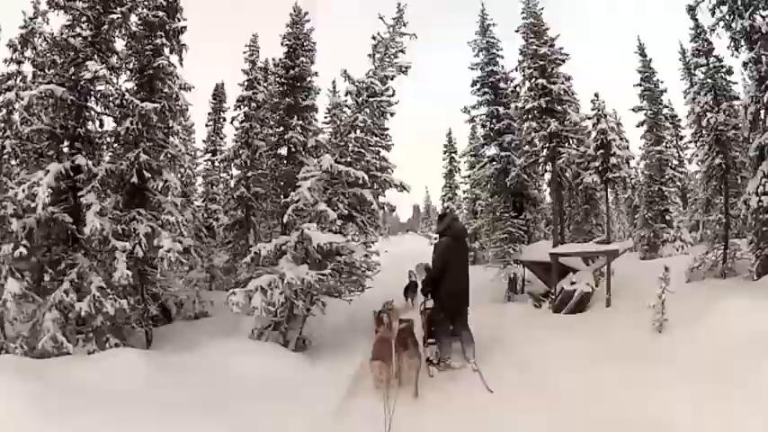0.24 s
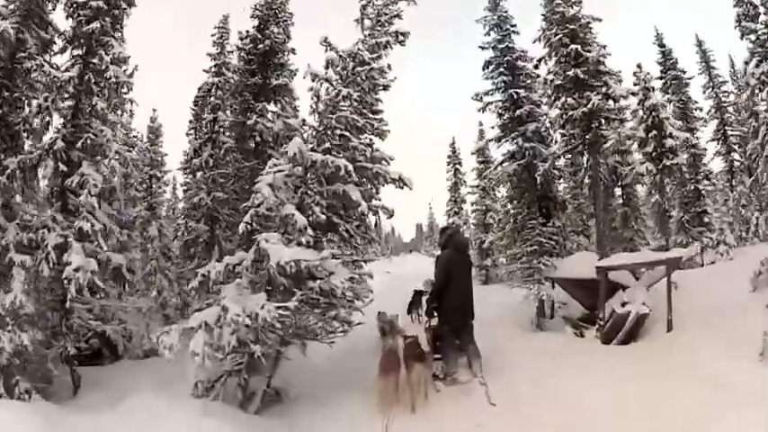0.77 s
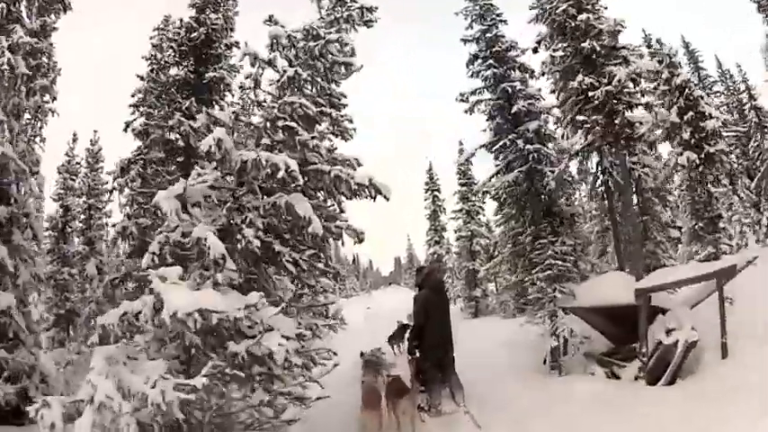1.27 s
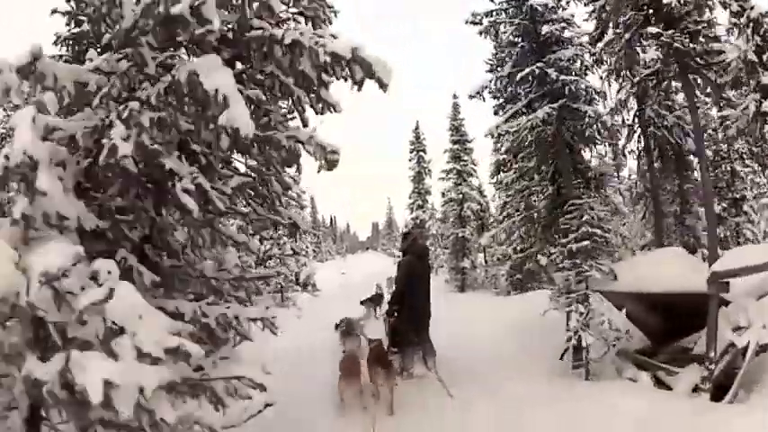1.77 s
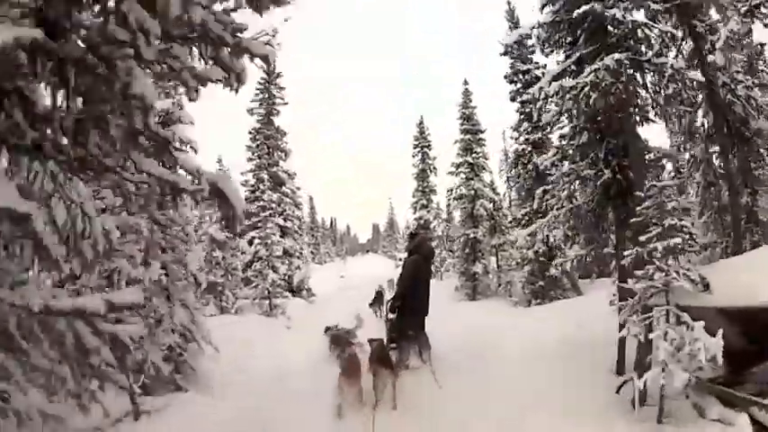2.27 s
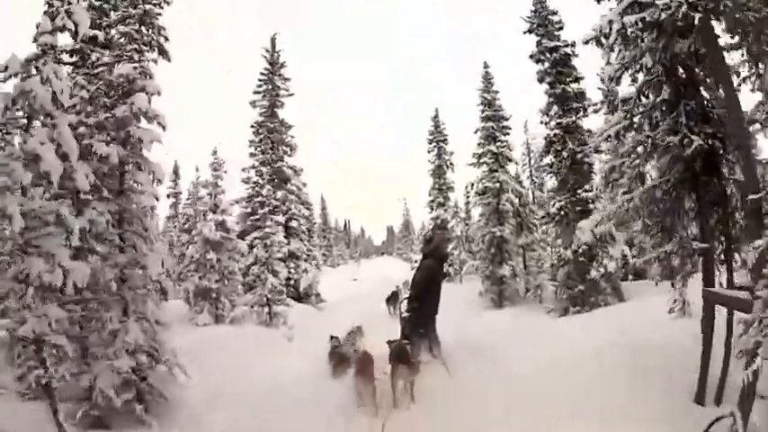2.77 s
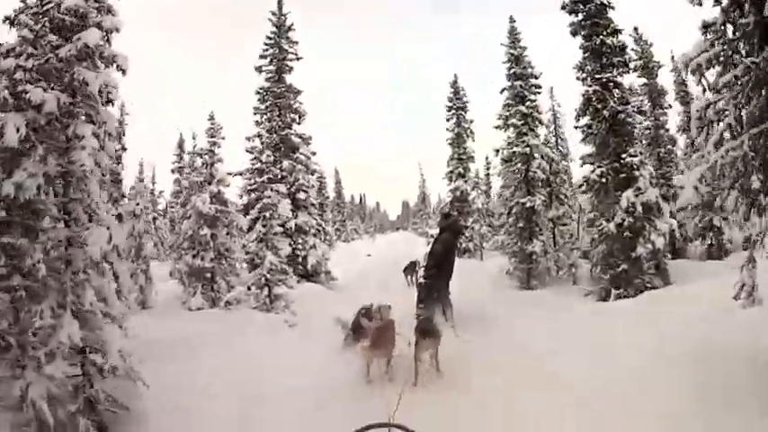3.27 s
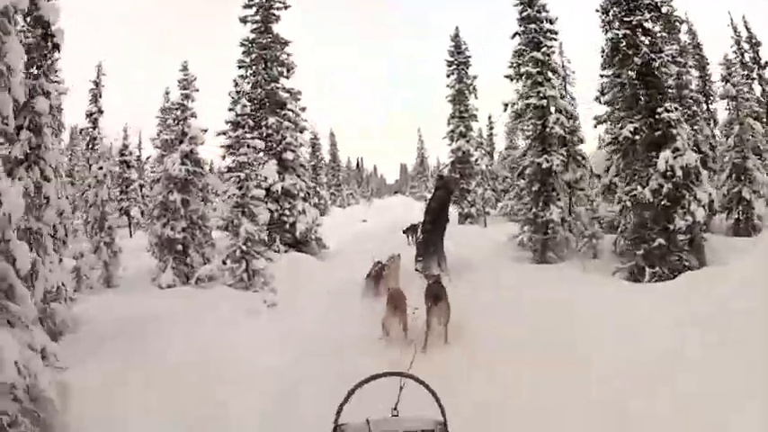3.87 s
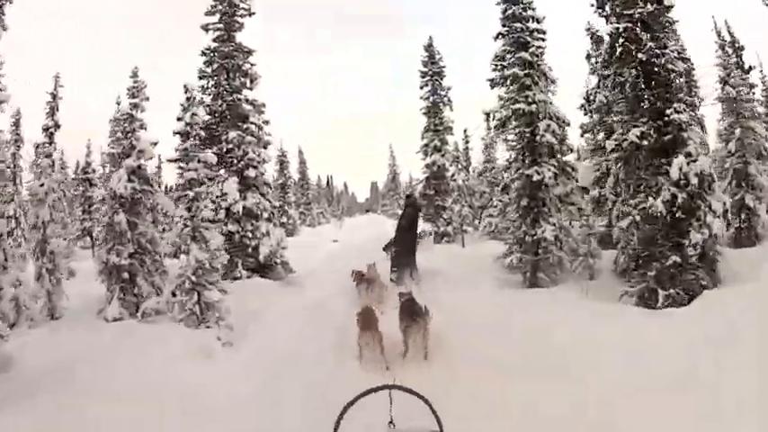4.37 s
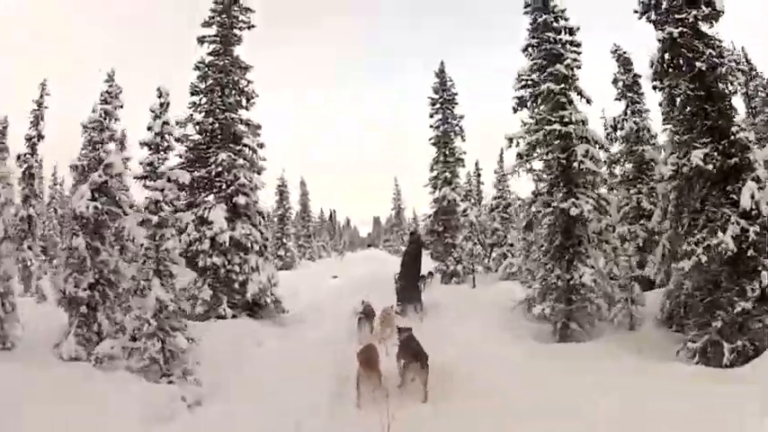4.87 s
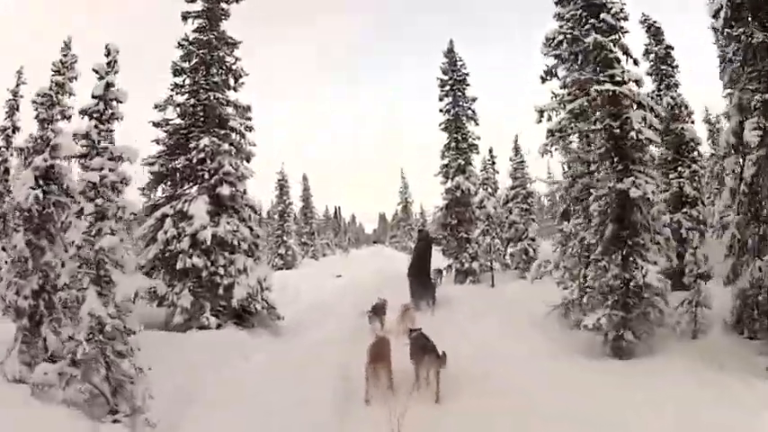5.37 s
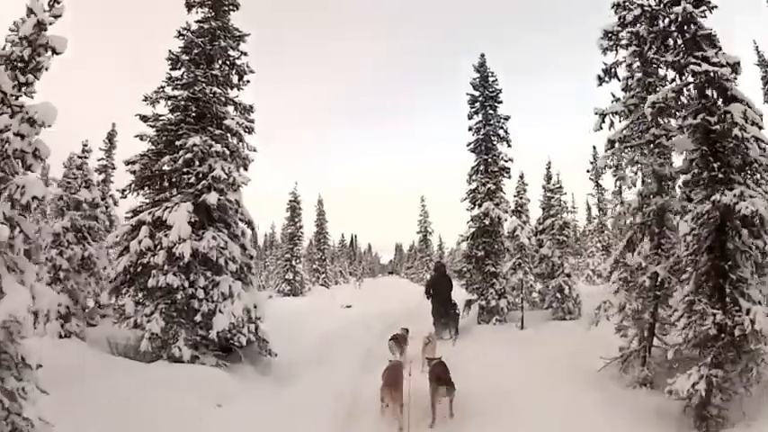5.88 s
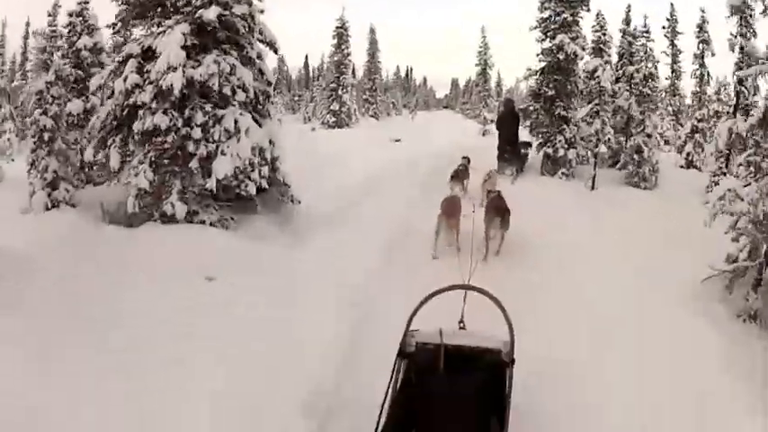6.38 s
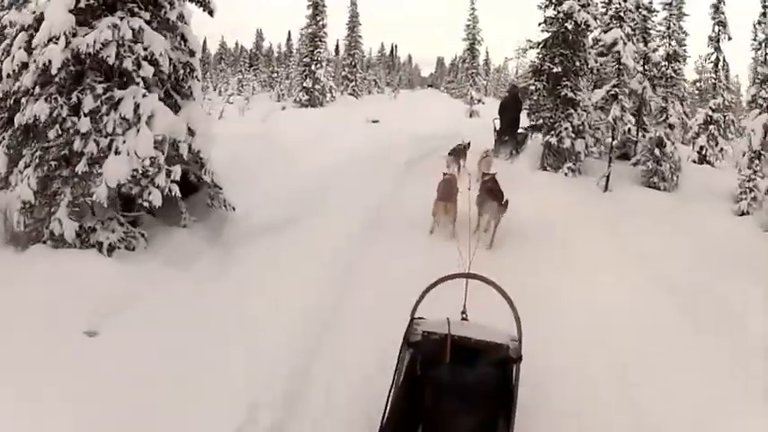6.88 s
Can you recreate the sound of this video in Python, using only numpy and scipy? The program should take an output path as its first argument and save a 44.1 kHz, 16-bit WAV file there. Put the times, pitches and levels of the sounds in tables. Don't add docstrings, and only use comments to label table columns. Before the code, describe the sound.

Close, dull and boxy sound from a camera riding on a sled in open snowy woods. Runners hit snow lumps, making the wooden frame thud and hum at low pitch without any steady rhythm. Wind bumps softly on the case, a loose catch clicks, and thin icy hiss leaks through. Powder brushes past briefly at two seconds; a sharp twig flick comes late, among final heavy knocks.

```python
import sys
import numpy as np
from scipy import signal
from scipy.fft import rfft, irfft, next_fast_len
from scipy.io import wavfile
from scipy.ndimage import uniform_filter1d

SR = 44100
rng = np.random.default_rng(int(sys.argv[2]) if len(sys.argv) > 2 else 0)


def decibels_to_gain(level_db):
    exponent = np.asarray(level_db, float) / 20
    return 10 ** exponent


def persist_wave(psi):
    counts = np.round(np.clip(psi, -1, 1) * 32767).astype(np.int16)
    wavfile.write(sys.argv[1], SR, np.atleast_2d(counts).T)


N = 314874

# (time [s], shaking change [dB], half length [s])
TRAIL_HUMPS = [(3.28, -4, 0.013), (.1, 10, 0.053), (.22, 10.5, 0.038), (.46, 6, 0.013), (.52, -14, 0.0062),
               (.72, 1, 0.067), (1.05, 1.5, 0.08), (1.39, 8, 0.082), (1.67, 6, 0.11), (1.91, 7.5, 0.064),
               (2.17, 1.5, 0.042), (2.33, 6.5, 0.073), (2.62, 6, 0.018), (2.72, 10, 0.08), (3.04, 4, 0.094),
               (3.21, 6, 0.038), (3.64, 4.5, 0.024), (3.72, -2.5, 0.018), (3.82, 10, 0.013),
               (4.21, 7, 0.11), (4.26, -12, 0.02), (4.57, 10, 0.085), (4.79, 11.5, 0.063), (4.92, 8, 0.04),
               (5.53, 4.5, 0.048), (6.03, 2, 0.052), (6.31, 7, 0.071), (6.45, -8.5, 0.095),
               (6.56, 2, 0.088), (6.7, 8, 0.22), (.405, -8, .008), (.64, -11, 0.0088), (1.48, -5.5, 0.023),
               (1.775, -5, .015), (3.555, -5, .008), (3.742, -9, 0.0079), (4.075, -9, 0.0075),
               (4.185, -12, 0.0054), (4.228, -13, .005), (6.52, 1, .02), (6.39, -3.5, .04)]
# (time [s], change [dB], half length [s])
SLAT_CHATTER = [(.01, 5, 0.016), (.64, 1, .03), (1.162, -0.5, 0.033), (1.282, 3.5, 0.033),
                (1.44, 2.5, 0.026), (1.64, -2.5, 0.068), (1.8, -6, .02), (2.44, 2.5, 0.037),
                (3.1, 0, 0.057), (3.72, 0.5, 0.026), (4.5, -0.5, .05), (4.84, -6, 0.025), (4.994, 5, 0.015),
                (5.16, 4.5, 0.039), (5.3, 1, 0.024), (5.498, 8, 0.019), (5.905, 4, 0.016), (6.32, 0, 0.021),
                (6.6, 0, .04), (6.83, 5.5, 0.033)]


def evened(x):
    return x / np.sqrt(np.mean(x ** 2) + 1e-20)


def curve(table, index):
    rows = np.array(table)
    return np.interp(np.arange(N) / SR, rows[:, 0], rows[:, index])


def bells(events):
    t = np.arange(0, N + 64, 64) / SR
    total_db = sum(db * np.exp(-((t - s) / half_s) ** 2) for s, db, half_s in events)
    return np.interp(np.arange(N) / SR, t, total_db)


def add(mix, s, sound):
    part = mix[round(s * SR):][:len(sound)]
    part += sound[:len(part)]


def resonate(x, hz, width_hz):
    turn = np.exp(2j * np.pi * np.cumsum(hz * np.ones(len(x))) / SR)
    r = np.exp(-np.pi * width_hz / SR)
    once = signal.lfilter([1 - r], [1, -r], x / turn)
    twice = signal.lfilter([1 - r], [1, -r], once)
    return 2 * (turn * twice).real


def wobble(hz):
    smooth = uniform_filter1d(rng.standard_normal(N), 200)
    return evened(signal.lfilter([1], [1, -np.exp(-2 * np.pi * hz / SR)], smooth))


def noise(points, patchy_db, flicker_db, size):
    frames, hz = 4 * N // size + 8, np.fft.rfftfreq(size, 1 / SR)
    a, b, patches = rng.standard_normal((frames, len(hz), 3)).T
    patches = uniform_filter1d(patches, size=5, axis=0)
    patches = evened(uniform_filter1d(patches, size=8, axis=1))
    flicker = evened(uniform_filter1d(rng.standard_normal(frames), size=3))
    f, db = np.transpose(points)
    shape_db = np.interp(np.log(hz + 1), np.log(f + 1), db)[:, None]
    spectra = (a + 1j * b) * decibels_to_gain(shape_db + patchy_db * patches + flicker_db * flicker)
    return evened(signal.istft(spectra, nperseg=size, noverlap=3 * size // 4)[1][:N])


def frame():
    # (frequency [Hz], width [Hz], level [dB])
    frame_modes = [(159.5, 60, -12.5), (203.1, 13.7, 3), (242, 28.2, -2), (269.2, 21.2, 1),
                   (287.9, 19.7, 1.5), (335.8, 35, -3.5)]
    # (frequency [Hz], width [Hz], level [dB])
    slat_modes = [(450, 69, 0), (523, 22.2, 1.5), (554.8, 46, -4.5), (663.5, 77, -10), (753, 130, -19),
                  (1031, 125, -31)]
    # (time [s], roughness [dB], slat chatter [dB])
    trail = [(0, -35, 5), (.3, -24, 0.5), (.82, -22.5, 0), (.9, -32.5, 1), (1.2, -27.5, -0.5),
             (1.5, -28, -0.5), (2.0, -29, 2.5), (2.5, -25.5, -1.5), (2.85, -29.5, -3.5), (3.14, -26.5, 0.5),
             (3.5, -20.5, 0), (3.88, -24.5, 1.5), (4.06, -32.5, -1), (4.45, -34.5, -1.5), (5.3, -32, -1),
             (5.75, -25, 1.5), (6.2, -35.5, 1), (7.14, -24.5, 0.5)]
    # (time [s], change [dB], half length [s])
    flex = [(.08, 0.5, 0.033), (1.2, -3, .03), (1.5, 6, 0.041), (1.7, -4.5, .04), (2.32, 6, 0.046),
            (2.8, -5, 0.054), (2.96, 8.5, 0.029), (3.08, 4.5, .03), (3.3, 7.5, 0.095), (3.48, 2.5, 0.032),
            (3.59, -6, 0.017), (4.04, 5, 0.022), (4.2, -9, 0.035), (4.4, -3, 0.054), (4.62, -12, 0.063),
            (4.83, -9, 0.065), (5.23, 5, .06), (5.41, 5.5, 0.03), (5.8, -8, .03), (6.28, -11, 0.028),
            (6.4, 10, 0.032), (6.54, -15, 0.098), (6.68, 5, 0.019), (7.04, 13, 0.027)]
    lumps_per_s, slats_db, slats_on_rough, slats_on_hump = 260, -37, 0.45, 0.56

    sizes = decibels_to_gain(5.5 * np.minimum(rng.exponential(1, N), 4)) * rng.choice([-1., 1.], N)
    lumps = evened(sizes * (rng.random(N) < lumps_per_s / SR))
    drive = (0.44 * lumps + 0.9 * rng.standard_normal(N)) * decibels_to_gain(0.65 * wobble(hz=14))

    def ring(modes):
        return [(-1) ** k * decibels_to_gain(db) * resonate(drive, hz, 1.57 * width_hz)
                for k, (hz, width_hz, db) in enumerate(modes)]

    low = ring(frame_modes)
    low = evened(decibels_to_gain(bells(flex)) * sum(low[:2]) + sum(low[2:]))
    slats = evened(sum(ring(slat_modes)))
    rough_db, hump_db = curve(trail, index=1), bells(TRAIL_HUMPS)
    slats_db = slats_db + bells(SLAT_CHATTER) + curve(trail, index=2)
    slats_db = slats_db + slats_on_rough * (rough_db - rough_db.mean()) + slats_on_hump * hump_db
    return decibels_to_gain(rough_db + hump_db - 0.5) * low + decibels_to_gain(slats_db) * slats


def jolts():
    # (time [s], peak [dB], frequency [Hz])
    ridges = [(0.375, -0.5, 197), (4.66, -10.5, 324), (0.203, -4, 294), (0.291, -6, 275), (0.539, 4, 214),
              (0.569, -3, 206), (0.612, 3.5, 291.5), (0.666, 3.5, 190), (1.142, -5.5, 242),
              (1.569, -9, 204), (1.795, -2, 269), (1.894, 3, 267), (2.035, -3, 271), (2.169, 2, 242),
              (2.884, -3.5, 230), (3.754, -14, 241), (3.906, -4, 257), (4.124, -7.5, 277),
              (4.277, -9, 261.3), (4.498, -7, 353), (4.882, -18, 270), (4.99, -4.5, 270), (5.093, -7, 279),
              (5.351, -5, 251), (5.466, -6.5, 244), (5.487, -4.5, 325), (5.62, -6.5, 247), (6.026, -4, 245),
              (6.552, 0.5, 279), (7.088, -2, 205), (0.175, -14, 280), (0.243, -8, 267), (0.704, -4, 242),
              (0.976, -5, 243), (1.037, -6, 280), (3.22, -8, 215), (1.318, -3, 258), (1.53, -14, 264),
              (1.625, 0, 246), (1.68, 2.5, 272), (2.11, -14, 318), (2.286, -17, 225), (2.311, -2.5, 215),
              (2.368, 0, 268), (2.61, -13, 202), (2.71, -2, 267), (3.012, -10, 218), (3.308, -8, 248),
              (3.425, -3.5, 272), (3.625, -1.5, 284), (3.779, -2, 209), (4.44, -21, 276), (4.95, -9.5, 278),
              (5.545, -9, 300), (5.999, -7.5, 284), (6.59, -7, 263), (6.796, -15, 262)]
    # (time [s], peak [dB], frequency [Hz])
    slaps = [(0.09, -9, 368), (1.032, -18.5, 617), (2.5, -24, 570), (3.64, -13, 534), (5.11, -21.5, 618),
             (5.468, -15.5, 520), (5.82, -12.5, 450), (5.95, -21, 567), (6.74, -16, 450),
             (6.85, -11.5, 502), (0.32, -14.5, 437), (0.378, -20, 470), (0.596, -18, 502),
             (0.707, -15, 493), (0.822, -12, 517), (1.832, -18, 530), (2.373, -25, 554), (3.018, -17, 480),
             (0.67, -15.5, 514), (4.876, -16, 450), (5.442, -17, 518), (5.651, -14, 523), (6.065, -13, 480),
             (6.802, -10, 520), (0.438, -18, 458), (0.635, -19, 420), (0.743, -24, 497),
             (1.241, -23.5, 506), (1.391, -13.5, 443), (1.901, -19, 528), (1.92, -14.5, 537),
             (2.415, -26, 450), (2.651, -15.5, 437), (3.053, -18, 565), (3.374, -23, 460),
             (3.521, -15, 533), (3.784, -12, 467), (4.146, -20, 496), (5.157, -20.5, 447),
             (5.549, -18, 550), (5.596, -16.5, 536), (5.907, -9.5, 430), (6.274, -19, 500),
             (6.318, -17, 486), (6.599, -20, 450), (1.182, -23, 536), (1.266, -22, 520), (2.326, -25, 580)]
    # (time [s], peak [dB], frequency [Hz])
    load_drops = [(0.86, -16.5, 70), (2.16, -14, 127), (3.28, -29, 110), (3.73, -16, 119),
                  (3.98, -15.5, 121), (1.23, -12, 45), (0.013, -5, 102), (0.21, -1.5, 147),
                  (2.252, -8, 159), (3.86, -3.5, 131), (6.905, -9, 126), (7.019, -1, 72)]
    # (time [s], peak [dB], frequency [Hz])
    washboards = [(0.07, -8, 330), (0.09, -6, 280), (2.13, -4, 184), (0.839, -12, 480), (3.8, -14, 300),
                  (3.648, 1.5, 189), (3.797, -2, 195), (6.299, -1.5, 273.3), (6.69, -0.5, 313),
                  (6.82, 2, 217), (6.8, -14, 518), (7.7, -7, 440), (3.66, -11, 520)]

    out, t = np.zeros(N), np.arange(9000) / SR
    for events, rise_s, trim_db, t60_s in ((ridges, 0.007, -3.5, 0.06),
                                           (slaps, 0.0025, -4, 0.064),
                                           (load_drops + washboards, 0.012, -4, 0.092)):
        rise = 1 - np.exp(-(t / rise_s) ** 2)
        for s, db, hz in events:
            decay = decibels_to_gain(db + trim_db - 60 * t / t60_s)
            add(out, s, decay * rise * np.sin(2 * np.pi * hz * t))
    return out


def snow():
    # (frequency [Hz], density [dB per Hz])
    hiss_spectrum = [(470, -21), (800, -5.5), (907, -13), (1200, -14), (1430, -13.5), (1650, -16.5),
                     (1980, -13), (2250, -15.5), (2510, -14.5), (2740, -12), (3150, -20), (3320, -17.5),
                     (3650, -19), (3820, -25.5), (4830, -22.5), (5900, -34.5), (7670, -51), (13000, -120)]
    # (time [s], level [dB])
    glide = [(0.0, -53), (0.12, -54), (1.09, -55.5), (1.43, -53.5), (2.3, -54.5), (2.9, -56), (3.56, -54),
             (4.32, -57.5), (4.45, -55.5), (4.59, -56), (4.77, -54.5), (5.19, -56.5), (5.73, -56.5),
             (6.24, -57), (6.82, -54), (7.14, -50.5)]
    # (time [s], hiss change [dB], half length [s])
    patches = [(.3, 2.5, 0.043), (1.88, -2, 0.054), (2.86, -1, 0.052), (3.58, -2, .04), (3.74, 2, 0.087),
               (4.28, -1, .04), (4.7, 4, 0.027), (5.9, 2.5, 0.042), (6.45, 4, 0.048), (6.97, 4, 0.026),
               (.4, -2, .03), (1.08, -1, .03), (1.24, 1.5, .03), (3.84, -2.5, 0.015), (4.36, -2, 0.034),
               (4.45, 2.5, .04), (5.28, 3, 0.02), (6.12, -2.5, .03), (6.28, -1.5, 0.025), (6.72, 1.5, .04)]
    # (time [s], level [dB])
    spray = [
        (2.0, -66),
        (2.05, -59),
        (2.075, -55),
        (2.16, -55.5),
        (2.215, -56),
        (2.24, -63),
        (2.27, -72),
    ]
    glide_db, hiss_on_hump = 3, 0.2

    crackle = decibels_to_gain(2.3 * np.minimum(rng.exponential(1, N), 3)) * (rng.random(N) < 150 / SR)
    grain = 1 + 0.31 * signal.oaconvolve(crackle, np.exp(-np.arange(300) / 60.))[:N]
    hiss = noise(hiss_spectrum, patchy_db=1.5, flicker_db=0.55, size=512)
    hiss = evened(grain * decibels_to_gain(0.5 * wobble(hz=5)) * hiss)
    hiss_db = glide_db + bells(patches) + curve(glide, index=1)
    hiss_db = hiss_db + hiss_on_hump * bells(TRAIL_HUMPS + SLAT_CHATTER)

    flakes = rng.standard_normal(N) * (1 + 2.5 * (rng.random(N) < 900 / SR))
    sweep_hz = np.interp(np.arange(N) / SR, (2.06, 2.2), (4250, 4900))
    powder = evened(resonate(flakes, sweep_hz, width_hz=1700)) * decibels_to_gain(0.6 * wobble(hz=40))
    return decibels_to_gain(hiss_db) * hiss + decibels_to_gain(curve(spray, index=1)) * powder


def scrapes():
    # (time [s], peak [dB], frequency [Hz], length [s])
    breaks = [(0.807, -48, 2100, 0.016), (1.443, -51, 2690, 0.015), (1.718, -51, 1920, 0.015),
              (1.86, -45, 2000, 0.03), (1.9, -53, 2700, 0.025), (1.92, -48, 1320, .02),
              (1.875, -47, 2650, .015), (0.7, -47, 1080, 0.043), (4.106, -53, 2500, 0.032),
              (4.187, -53, 1900, 0.011), (4.272, -54, 3400, 0.015), (4.6094, -59, 2100, 0.018),
              (4.69, -46.5, 2600, 0.015), (4.411, -54, 2300, 0.04), (4.78, -59, 3100, 0.028),
              (4.19, -52, 2600, .01), (5.427, -46, 2260, 0.018), (5.637, -49, 1620, 0.022),
              (6.447, -51, 2320, 0.019), (6.679, -41, 2040, 0.0078), (6.7491, -46, 1940, 0.0092),
              (6.972, -46, 2570, 0.012)]

    out, t = np.zeros(N), np.arange(4000) / SR
    for s, db, hz, length_s in breaks:
        u = t / max(length_s, 0.002)
        grit = evened(resonate(rng.standard_normal(4000), hz, width_hz=400))
        add(out, s, decibels_to_gain(db - 4.5) * grit * 3 * u * np.exp(1 - 3 * u))
    return out


def rattle():
    # (time [s], peak [dB], each bounce [dB], first gap [ms], lower ring [dB])
    strikes = [(0.015, -40.5, -8, 6.6, -16), (0.158, -50, -2, 4.9, -9), (0.248, -37, -6, 6.7, 0),
               (0.424, -38.5, -6, 7.6, 2), (0.573, -46, -3, 5.6, -10), (0.6931, -50, -6, 7.7, -2),
               (0.8635, -40, -14, 8.8, -10), (1.5996, -43, -8, 6.6, 2), (1.696, -46, -6, 6.2, -2),
               (1.7915, -40.5, -7, 5.4, -5), (3.332, -50, -0.5, 4.6, -8), (3.734, -51, 1, 3.6, -10),
               (3.9413, -42, -9, 10.5, -10), (4.224, -37, -6, 7.2, 0.5), (6.314, -47, -7, 9, -4)]
    # (time [s], peak [dB], lower ring [dB])
    touches = [(0.3098, -55, -1), (0.3438, -52, -9), (0.3648, -50, -4), (0.417, -52, -12), (0.4935, -50, 3),
               (0.5253, -51, -9), (0.6358, -52, -13), (0.838, -46, -4), (0.9715, -50, -3), (0.9936, -55, 0),
               (1.669, -48, 3), (1.734, -53, 1), (2.339, -53, 0), (2.8518, -45, -5), (3.16, -42.5, -2.5),
               (3.2452, -51, 4), (3.297, -46, -11), (3.3216, -47, -8), (3.4672, -51, -2),
               (3.7254, -47, -19), (3.8623, -51, -6), (3.8735, -53, 6), (3.997, -46, -10), (4.6097, -52, 8),
               (4.8607, -39.5, -1), (4.868, -49, 0), (1.563, -51, 0), (1.5746, -53, 0), (1.639, -54, 0),
               (1.672, -51, 0), (1.7828, -54, 0), (3.2412, -54, 0), (0.6744, -55, 0), (0.2885, -55, -5),
               (0.26, -46, -4), (6.3204, -44.5, -8), (4.2765, -60, 14), (4.253, -53, 2), (5.3746, -51, -2),
               (5.414, -46, 2), (5.6549, -51, 13), (5.864, -54, 16), (6.795, -50, 12)]
    # (frequency [Hz], level [dB], t60 [s])
    case_low = [(2780, -1.5, 0.0079), (1900, -10, .008), (1200, -26, .008)]
    # (frequency [Hz], level [dB], t60 [s])
    case_high = [(4805, 7, 0.0047), (5260, -1.5, 0.0074), (3760, -9, 0.011)]

    ticks = list(touches)
    for s, db, bounce_db, gap_ms, low_db in strikes:
        for k, gaps in enumerate((0, 1, 1.5)):
            ticks.append((s + gaps * gap_ms / 1000, db + k * bounce_db, low_db))

    out, t = np.zeros(N), np.arange(900) / SR
    onset = 1 - np.exp(-t / 0.00029)
    for s, db, low_db in ticks:
        odd = rng.standard_normal(12)
        modes = [(hz, d + low_db, t60_s) for hz, d, t60_s in case_low] + case_high
        ring = 0
        for k, (hz, d, t60_s) in enumerate(modes):
            mode_hz = hz * (1 + 0.034 * odd[k + 6])
            ring = ring + decibels_to_gain(d + 0.8 * odd[k] - 60 * t / t60_s) * np.sin(2 * np.pi * mode_hz * t)
        add(out, s - 0.0001, decibels_to_gain(0.89 * (db + 46) - 40.4) * ring * onset)
    return out


def snaps():
    # (time [s], peak [dB])
    flicks = [
        (2.3384, -49),
        (5.8625, -35),
        (5.9594, -46),
        (6.7926, -27),
    ]

    out, u = np.zeros(N), np.arange(60) / 5.9
    for s, db in flicks:
        add(out, s + 0.00054, decibels_to_gain(db + 1.5) * (1 - u) * np.exp(-u))
    return out


def wind():
    # (frequency [Hz], density [dB per Hz])
    wind_spectrum = [(8, -58), (32, -6.5), (58, -2.5), (90, -2), (140, -2.5), (200, -9), (400, -9.5),
                     (700, -59)]
    # (time [s], level [dB])
    breeze = [(0, -26.5), (.15, -32.5), (.85, -38.5), (1.3, -37), (1.6, -28.5), (1.9, -41.5), (2.4, -38.5),
              (2.75, -46), (2.9, -44), (3.75, -45.5), (4.0, -36), (4.5, -44.5), (5.1, -33), (5.45, -41),
              (5.9, -32.5), (6.4, -34), (6.7, -38.5), (7.14, -23.5)]
    # (time [s], change [dB], half length [s])
    gusts = [(.02, 6.5, 0.028), (4.65, -1.5, 0.074), (2.85, 7, 0.039), (4.4, 4, 0.054), (.24, 1, 0.04),
             (.54, 22, 0.0088), (.73, 5, 0.036), (1.09, 5.5, 0.033), (1.2, 5, 0.024), (1.41, -0.5, .04),
             (1.55, 10.5, 0.027), (1.81, 6.5, .03), (2.06, 9.5, 0.025), (2.13, -8, .025),
             (2.26, 13.5, 0.029), (4.26, -4, 0.014), (4.85, 4, 0.035), (5.44, 5, .03), (5.58, 8.5, 0.086),
             (6.86, 9.5, 0.068), (6.95, 3, .05)]

    thuds = noise(wind_spectrum, patchy_db=1.0, flicker_db=1.2, size=2048)
    return decibels_to_gain(curve(breeze, index=1) + bells(gusts)) * thuds


def scene():
    return (frame() + jolts() + snow() + scrapes() + rattle() + snaps() + wind())[None]


def low_pass(x):
    return signal.sosfilt(signal.butter(12, 16410, fs=SR, output="sos"), x)


def record(dry):
    hold_hz, play_hz = 12000, 48000
    size = next_fast_len(N + 4096)
    ongoing = np.pad(dry, ((0, 0), (2048, size - N - 2048)), "reflect")
    ongoing = ongoing * signal.windows.tukey(size, 2048 / size)
    hz = np.fft.rfftfreq(size, 1 / SR) + 1e-3
    limited = irfft(rfft(ongoing) / (1 + (hz / 5750) ** 30), size)
    mirrored = limited * (1 + 2 * np.cos(2 * np.pi * hold_hz * np.arange(size) / SR))
    step = np.sin(np.pi * hz / hold_hz) / np.sin(np.pi * hz / play_hz) * hold_hz / play_hz
    own_hiss = decibels_to_gain(-69.5) * rng.standard_normal(size)
    edge = decibels_to_gain(-60 * np.clip((hz - 15250) / 350, 0, 1))
    held = irfft((rfft(mirrored) * step + rfft(own_hiss)) * edge, size)[:, 2048:N + 2048]
    return low_pass(held)


dry = scene()
out = record(dry)
persist_wave(out)
```